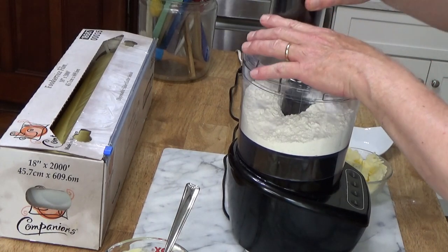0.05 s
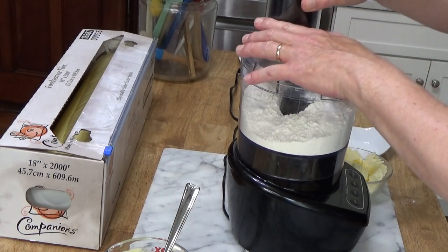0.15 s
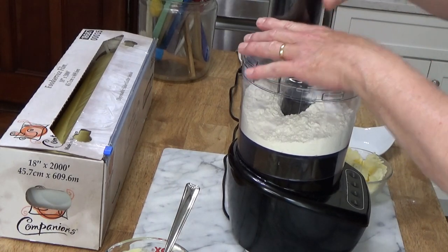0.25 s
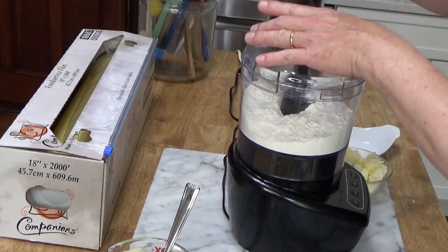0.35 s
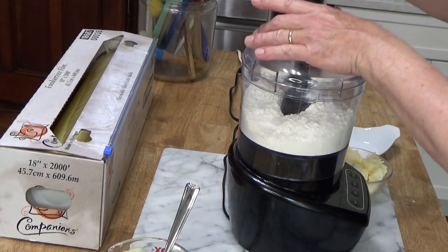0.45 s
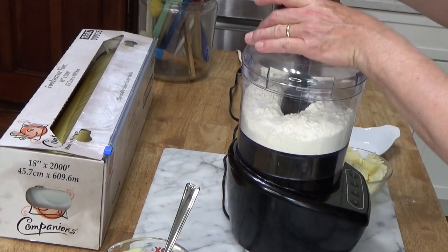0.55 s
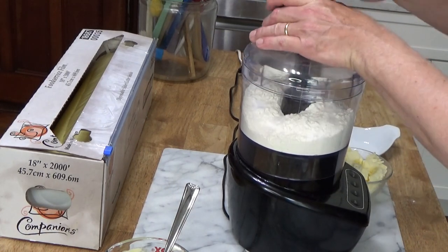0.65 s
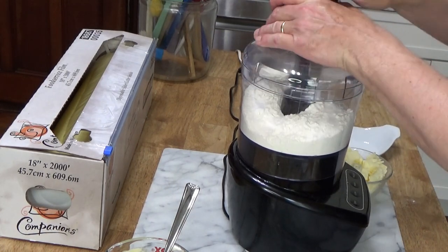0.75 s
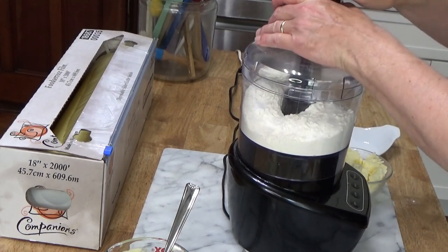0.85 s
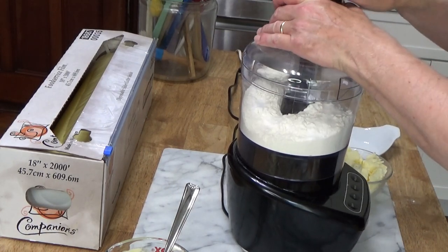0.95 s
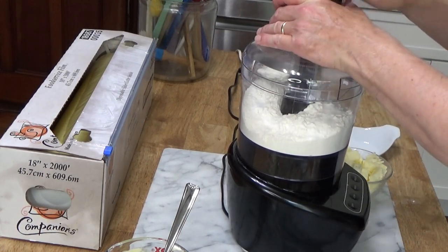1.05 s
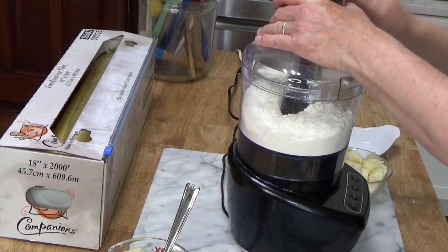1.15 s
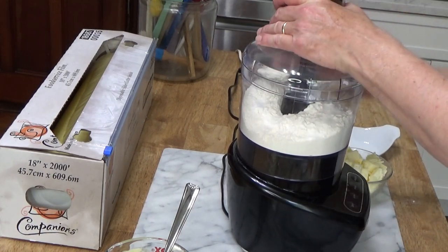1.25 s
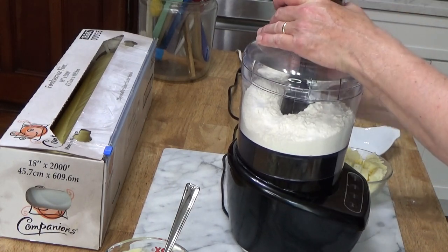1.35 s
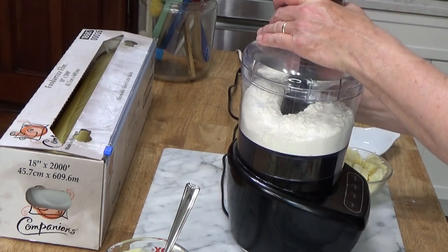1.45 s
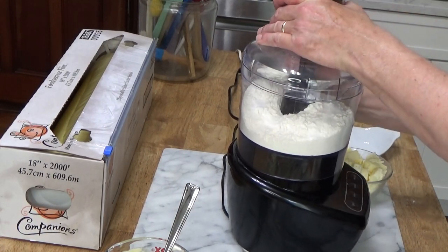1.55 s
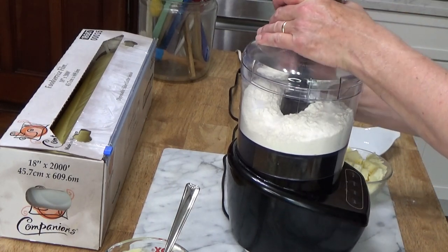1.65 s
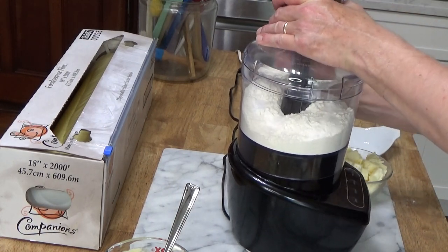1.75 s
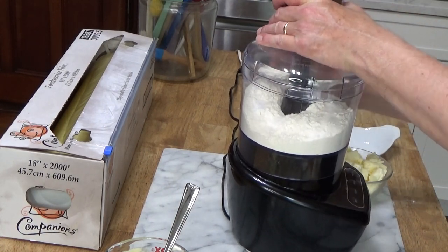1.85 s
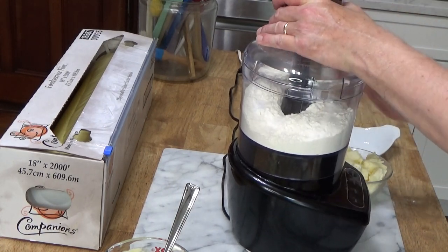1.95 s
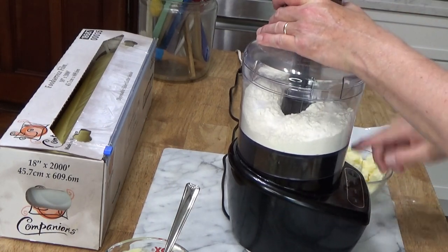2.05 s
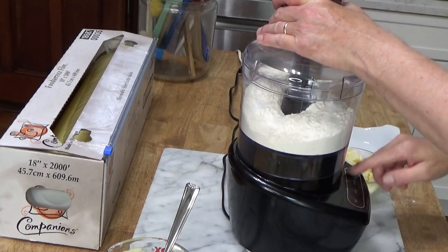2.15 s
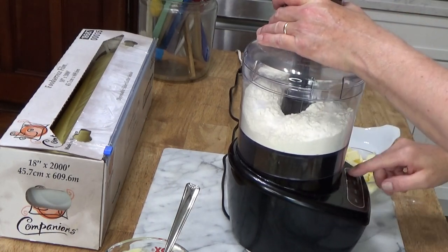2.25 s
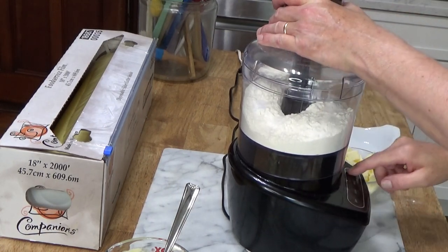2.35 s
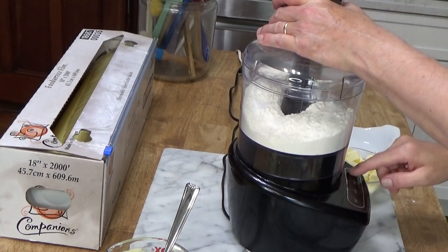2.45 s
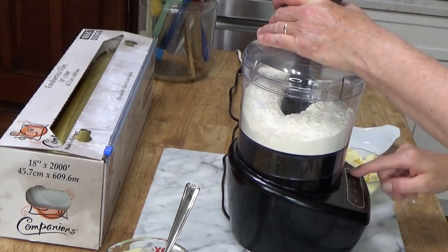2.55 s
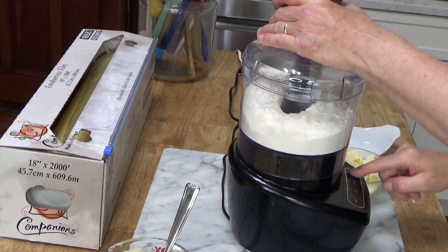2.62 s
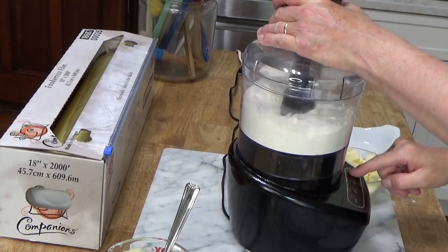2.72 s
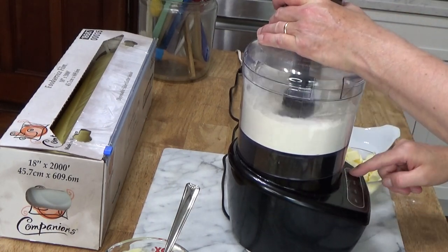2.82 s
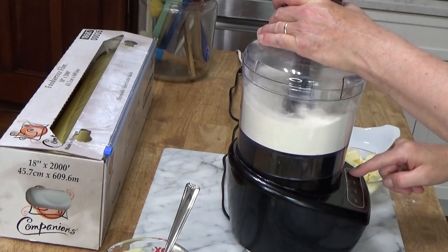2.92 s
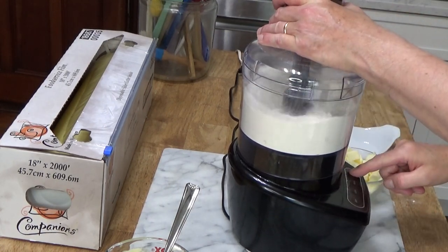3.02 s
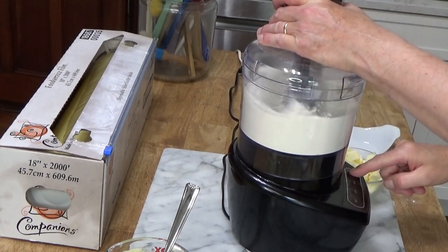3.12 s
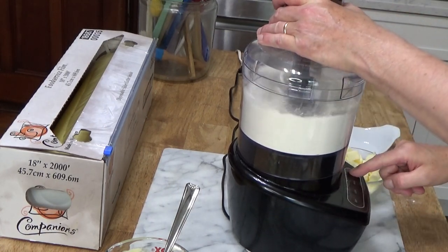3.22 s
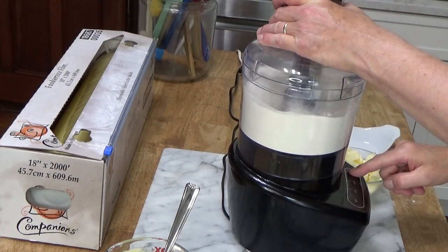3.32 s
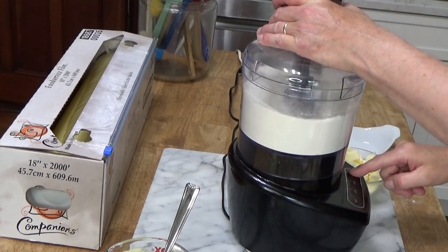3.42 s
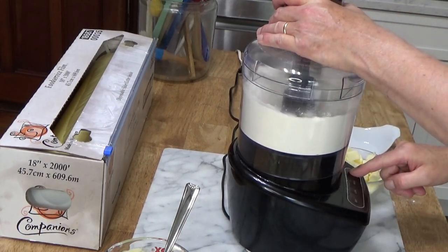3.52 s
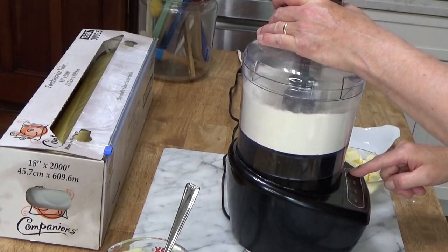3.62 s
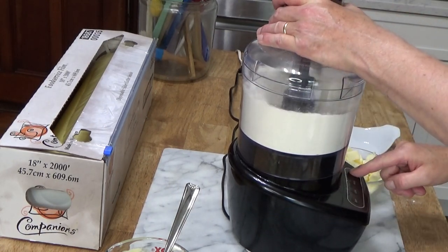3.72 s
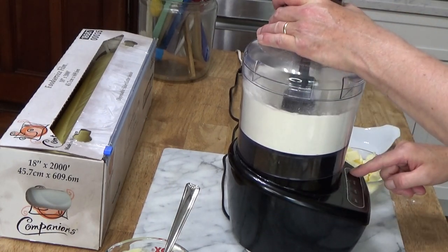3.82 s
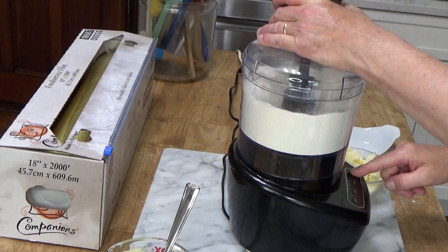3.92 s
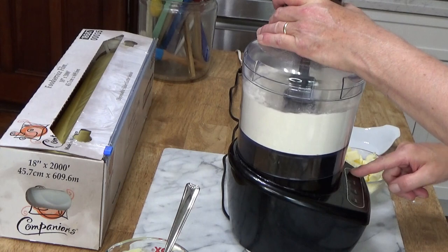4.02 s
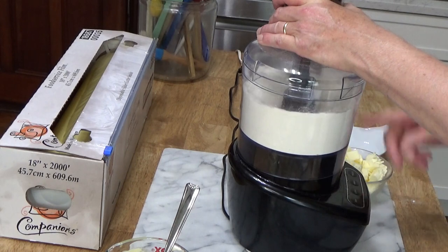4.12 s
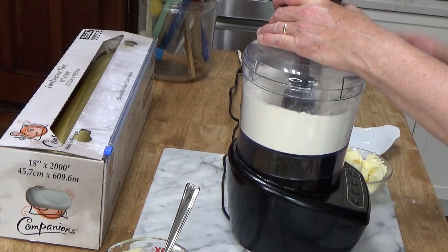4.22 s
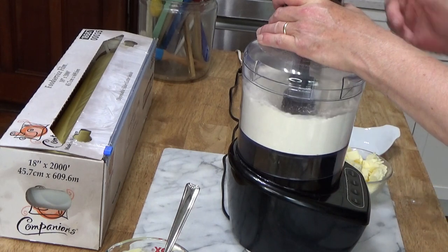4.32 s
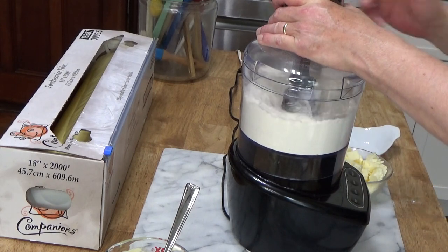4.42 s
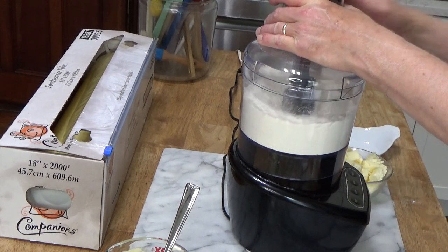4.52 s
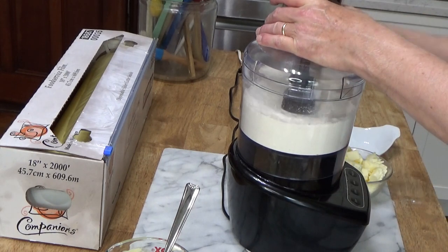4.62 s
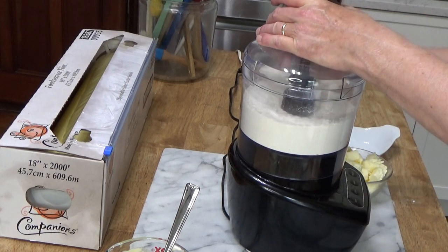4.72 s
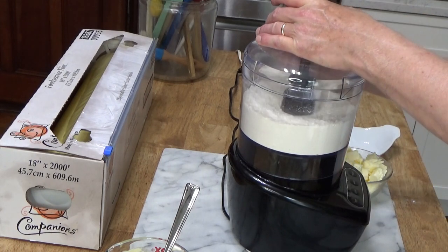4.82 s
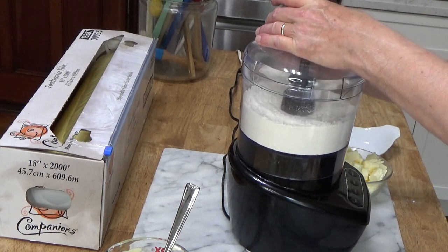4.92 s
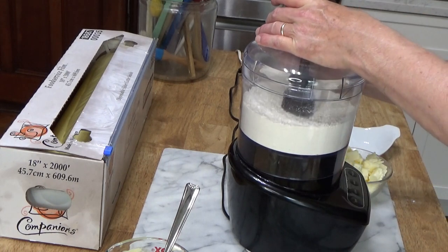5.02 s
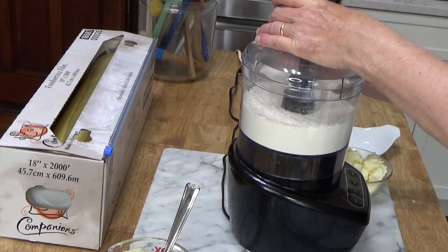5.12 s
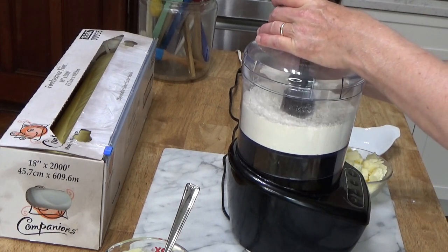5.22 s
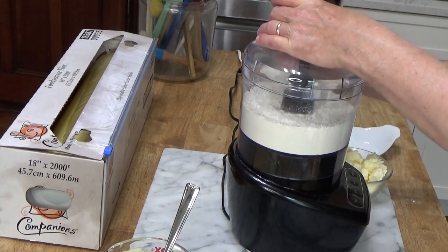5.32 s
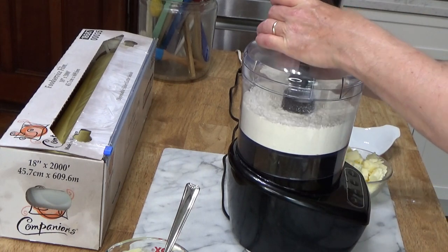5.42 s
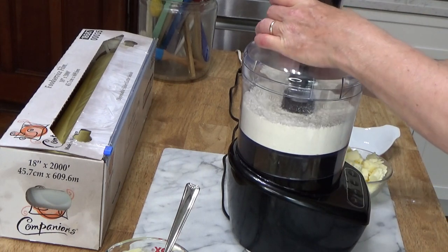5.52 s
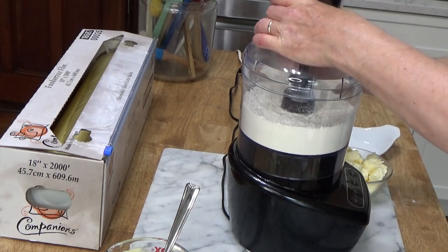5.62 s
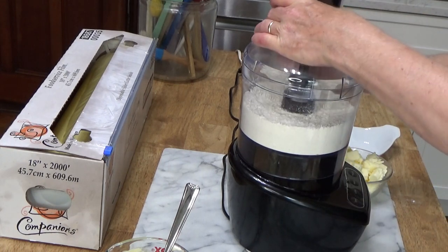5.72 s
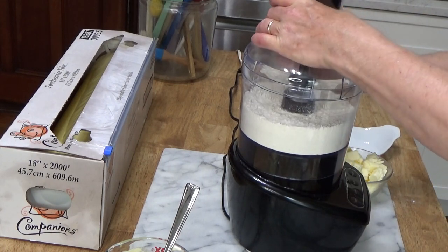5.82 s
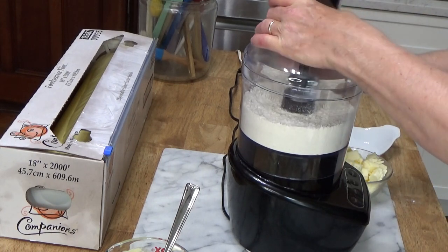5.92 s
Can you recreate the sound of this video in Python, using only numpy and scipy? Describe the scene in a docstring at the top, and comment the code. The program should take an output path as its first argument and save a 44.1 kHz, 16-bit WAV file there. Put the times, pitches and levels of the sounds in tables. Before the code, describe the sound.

Close in a hard, quiet kitchen, a plastic pusher clatters hollowly into a food processor tube, with small knocks and rubbing. Quick ticks lead to a sharp loud clack. After a pause, the motor surges on, runs as a loud airy roar for over a second, then glides down in pitch to a stop, followed by a light plastic click.

```python
"""A food processor runs for one pulse: air rushes, the rotor hums and the commutator whines, then it coasts to rest.
Filtered noise makes the air, fine random impacts make gears and sparks, and sine waves follow the turning shaft.
Before it, the plastic pusher knocks and slides into the feed tube and the bowl ratchets home; after it, the lid
is gripped again. Knocks are short noise bursts, rubbing is fine random impacts and the tube is wavering tones.
A hard kitchen adds echoes over a quiet floor, and a limiter holds down the loudest moments."""
import sys
import numpy as np
from scipy import signal
from scipy.fft import rfft, irfft, next_fast_len
from scipy.io import wavfile
from scipy.ndimage import uniform_filter1d

SR = 44100
rng = np.random.default_rng(int(sys.argv[2]) if len(sys.argv) > 2 else 0)


def file_out(sig):
    """Save sig as 16-bit WAV at sys.argv[1]."""
    # one column per channel
    cols = np.atleast_2d(sig).T
    # limit, then scale
    lim = np.clip(cols, -1, 1)
    pcm = np.round(lim * 32767).astype(np.int16)
    wavfile.write(sys.argv[1], SR, pcm)


N = 263076

# Levels in the tables are relative: the sounds are balanced again when mixed.
# Tone of the still kitchen: pitch_hz, level_db (per Hz)
QUIET_COLOUR = [(18, -57), (30, -31), (71, 0), (209, -4.5), (293, 9), (1010, 3.5), (7180, -3), (8190, -3),
                (10400, -4.5), (15800, -10)]
QUIET_DB = -62
# Time for echoes to fade by 60 dB: pitch_hz, fade_s
ECHO_FADE = [(150, 0.8), (400, 0.6), (1000, 0.65), (2800, 0.65), (7000, 0.54), (14000, 0.49)]
# Stereo width: pitch_hz, side_minus_mid_db
STEREO_WIDTH = [(60, -14), (120, -24.5), (240, -27), (480, -21), (950, -12), (1890, -11.5), (3770, -15),
                (7520, -9.5), (13000, -32)]
# Left-right balance: pitch_hz, left_minus_right_db
BALANCE = [(60, 0), (120, 2), (240, -3), (480, -2), (950, -1.5), (1890, -1.5), (3770, -1.5), (7520, -1.0),
           (15000, 1.5)]
CUTOFF_HZ = 15900

# Plastic parts striking each other: start_s, level_db, brightness_db_per_octave, decay_ms
KNOCKS = [(0.119, -14, 1.5, 4.7), (0.268, -25.5, 2.5, 2.5), (0.457, -31, 0, 4.2), (0.5922, -35.5, 4, 1.7),
          (0.7667, -31, 4.5, 3.8), (0.779, -31, -9.5, 4.6), (0.797, -30.5, 0.5, 2.4),
          (0.83, -32.5, 7.5, 3.4), (0.9014, -26.5, 4, 1.7), (0.980, -31, 6, 2.2), (1.011, -32, -1, 3),
          (1.029, -29, 5, 2), (1.046, -33, 2, 3), (1.296, -44.5, -4.5, 4.8), (1.393, -30.5, 2.5, 2.3),
          (1.6199, -3, 2.5, 5.5), (1.64, -18, 0.5, 3.2), (2.207, -46, 18, 2), (2.273, -47, 2, 2.6),
          (2.594, -52, -1, 9.1), (2.6155, -33, 3.5, 7.2), (5.694, -48, 3, 3), (5.8065, -27.5, 6, 4)]
# Dull blows on the bowl and base: start_s, level_db, decay_ms
THUDS = [(0.120, -23.5, 27), (1.622, -7, 4.6), (2.121, -46.5, 16), (2.157, -36, 16), (2.178, -40.5, 22),
         (5.830, -36.5, 3.2), (5.935, -44, 5.2), (5.953, -30, 4), (5.960, -32, 6)]
# Hollow pusher clattering into the mouth of the feed tube: start_s, level_db, decay_ms
CLATTER = [(0.001, -9, 3.4), (0.007, -8, 0.92), (0.017, -9, 2.9), (0.044, -5.5, 6.8), (0.071, -31, 4.8)]
# Short-lived ringing of the plastic bowl: pitch_hz, width_hz, boost_db
BOWL_RESONANCES = [(692.4, 58, 6.5), (1083, 123, 8.5), (1785, 730, 3), (2280, 250, 0.5), (2800, 300, 3),
                   (3380, 410, 4), (4960, 960, 4)]
# Tone of the knocks: pitch_hz, level_db (per Hz)
KNOCK_COLOUR = [(40, -47), (110, -15), (190, 2), (320, -10.5), (520, 3.5), (800, 7), (1250, 5), (2000, 2.5),
                (3000, -1), (4200, -3.5), (6000, -8), (10000, -16), (16000, -40)]
# Tone of the thuds: pitch_hz, level_db (per Hz)
THUD_COLOUR = [(40, -38), (110, -22), (220, -13), (450, -4.5), (800, 4), (1400, -15.5), (2500, -23),
               (8000, -49)]
# Tone of the clatter: pitch_hz, level_db (per Hz)
CLATTER_COLOUR = [(40, -41), (100, -37.5), (160, -16.5), (240, -15.5), (450, -15.5), (720, -6), (900, -16),
                  (1180, 4), (1400, -6.5), (2050, -2.5), (3300, -12), (4600, -11.5), (10000, -34),
                  (16000, -56)]
# Tone of rubbing plastic: pitch_hz, level_db (per Hz)
RUB_COLOUR = [(40, -40), (120, -11), (220, 9), (450, 3.5), (800, 10), (2000, 0.5), (5000, -3), (10000, -9),
              (16000, -25.5)]
# Tone of the dragging lid: pitch_hz, level_db (per Hz)
LID_COLOUR = [(500, -31), (1700, -1), (2150, 7), (2700, -2), (5000, 0.5), (7000, 2), (9500, -9),
              (12000, -20), (16000, -28)]
# The bowl ratchets round its seat in even ticks, each harder than the last
RATCHET_S, TICK_GAP_S = 1.4742, 0.0301
TICK_DB, TICK_GROWTH_DB = -37.5, 2.1
TICK_TILT_DB_PER_OCTAVE, TICK_DECAY_MS = 0.5, 3.6
# Strokes of plastic on plastic: start_s, length_s, level_db, swell_db (over the stroke)
RUBS = [(0, 0.076, -22.5, -15), (0.15, 0.81, -53.5, 5.5), (0.755, 0.33, -44.5, -2), (1.34, 0.19, -57, -2),
        (1.52, 0.09, -56, 22), (1.67, 0.33, -51, -0.5), (2.04, 0.038, -52, 6.5), (5.65, 0.24, -58, 0),
        (5.91, 0.068, -45, 15)]
# Lid dragging under the hand: start_s, length_s, level_db, swell_db (over the stroke)
LID_DRAGS = [(5.82, 0.065, -51, 15.5), (5.91, 0.06, -48, 1)]
RUB_ATTACK_S, RUB_RELEASE_S = 0.17, 0.083  # to rise and to fall by 60 dB

# Air ringing in feed tube and pusher: peak_s, pitch_hz, level_db, attack_s, release_s, unsteadiness_hz
# (attack and release each span 60 dB; pitch is at the peak)
TUBE_RINGS = [(0.07, 1149, -17, 0.32, 0.04, 64), (0.125, 649.5, -14, 0.02, 0.12, 34),
              (0.18, 640.6, -29, 0.088, 0.64, 20.3), (0.462, 682, -32.5, 0.018, 0.18, 19.8),
              (0.73, 661, -42.5, 0.5, 0.3, 24.5), (1.06, 694, -43.5, 0.5, 0.35, 19)]
# The air column shortens as the pusher sinks, so the pitch rises
TUBE_RISE_HZ_PER_S, TUBE_FLUTTER_DB = 170, 3

# The shaft speeds up while the button is held, coasts, then the flour stalls the blade
ON_S, OFF_S, STOP_S, STALL_S = 2.615, 3.937, 5.58, 0.225
TOP_TURNS_PER_S, SPIN_UP_S, SPIN_UP_SHAPE = 362.3, 0.160, 0.705
FRICTION_TURNS_PER_S2, DRAG_PER_S = 112.1, 0.589
# Running noise: level at top speed, power of speed its loudness follows, time to stir flour and air
RUN_DB, RUN_POWER, STIR_S = -15, 0.88, 0.024
# Fan air and churned flour at full speed: pitch_hz, level_db (per Hz)
RUSH_COLOUR = [(24, -98), (40, -48), (140, -25), (274, -11), (344, -8), (464, -13.5), (728, -0.5),
               (1790, -2), (2190, 1), (2950, -3), (3610, 1.5), (4090, -4.5), (5120, -0.5), (10600, -12.5),
               (15800, -34)]
# Gears and brushes when coasting: pitch_hz, level_db (per Hz)
GRIND_COLOUR = [(24, -73), (40, -56), (140, -36.5), (225, -15), (476, -15.5), (746, -0.5), (1110, -4),
                (1540, -3), (1750, -3), (2360, -2), (2610, -5.5), (3180, -6.5), (4090, -11), (9560, -17.5),
                (15800, -47)]
# Resonances of the housing: pitch_hz, width_hz, boost_db
HOUSING_RESONANCES = [(229, 66, 6), (330, 56, 2.5), (482, 50, 3), (750, 28, 7), (982, 40, 8), (1248, 45, 5),
                      (1541, 180, 6.5), (1900, 170, -1.5), (2222, 240, 6), (3150, 380, 4.5),
                      (4100, 370, -4), (4760, 290, 1.5), (6120, 330, 3), (8600, 78, 2), (9480, 490, 3),
                      (10500, 300, 2.5)]
# Resonances of the air ducts: pitch_hz, width_hz, boost_db
DUCT_RESONANCES = [(1530, 200, -0.5), (2406, 130, 6.5), (2810, 200, 5.5), (3633, 340, 8.5)]
# Resonances of the gear train and brush gear: pitch_hz, width_hz, boost_db
GEAR_RESONANCES = [(850, 93, 2), (1550, 350, 0), (6000, 300, 3), (7360, 800, -7), (8200, 170, 3),
                   (9760, 260, -3)]
# Faint rumble of the shaking base: pitch_hz, level_db (per Hz)
RUMBLE_COLOUR = [(20, 1), (50, 2), (90, -7), (200, -34), (800, -70)]
# How the base sounds the rotor's unbalance: pitch_hz, level_db
HUM_RESPONSE = [(80, -76), (125, -66.5), (165, -58), (200, -45.5), (230, -34), (360, -33)]
# How the base sounds the octave above: pitch_hz, level_db
OCTAVE_RESPONSE = [(140, -79), (220, -50), (480, -43.5), (640, -45), (690, -29.5), (718, -42)]
HUM_WAVER_DB = 0.5
# Starting current makes the brushes spark: peak level, and how sharply it peaks
SPARK_DB, SPARK_POWER = -24.5, 1.3
# Tone of the sparks: pitch_hz, level_db (per Hz)
SPARK_COLOUR = [(300, -22), (1500, -4), (3000, 9), (4200, -4), (6000, -5), (9500, -15), (12000, -20),
                (16000, -30)]
# Commutator overtones: multiple_of_shaft_speed, level_db
WHINE_OVERTONES = [(24, 1.5), (36, -4.5), (48, -2.5), (60, -3.5), (72, -2), (84, 4.5)]
# Band that the brush holders radiate: pitch_hz, level_db
BRUSH_HOLDER = [(2000, -28.5), (5000, -17), (6200, -12), (6900, 7), (7500, -2), (8050, 5.5), (8600, 0),
                (9000, -4), (9600, 2.5), (10400, -1), (15000, -39)]
# Overall whine at each shaft speed: turns_per_s, level_db
WHINE_BY_SPEED = [(40, -80), (85, -55), (120, -42.5), (180, -33), (300, -35.0), (355, -49)]


def from_db(db):
    """Turn decibels into a multiplier."""
    return 10 ** (np.asarray(db) / 20)


def rms_one(x):
    """Scale a sound to an average power of one."""
    return x / np.sqrt(np.mean(x ** 2) + 1e-20)


def at_hz(points, hz):
    """Read a curve between its points, with pitch spaced by ratio as the ear does."""
    f, value = np.transpose(points)
    return np.interp(np.log(np.maximum(hz, 1)), np.log(f), value)


def drift(rate_hz):
    """Smooth random wandering of typical size one, made at every 40th sample and joined up."""
    r = np.exp(-2 * np.pi * rate_hz * 40 / SR)
    noise = rng.standard_normal(N // 40 + 2002)
    slow = signal.lfilter([1], [1, -2 * r, r * r], noise)[2000:]  # skip the filter's settling
    return np.interp(np.arange(N) / 40, np.arange(len(slow)), rms_one(slow))


def coloured(x, spectrum, resonances=(), tilt_db=0):
    """Shape tone by a curve, resonance bumps and a tilt per octave, with no sound ahead of its cause."""
    size = 2 * next_fast_len(len(x) // 2 + 4096)
    hz = np.fft.rfftfreq(size, 1 / SR)
    db = at_hz(spectrum, hz) + tilt_db * np.log2(np.maximum(hz, 500) / 1000)
    for centre, width, boost in resonances:
        db = db + boost / (1 + (2 * (hz - centre) / width) ** 2)
    # Folding the cepstrum gives the filter that responds soonest (minimum phase)
    cepstrum = irfft(np.log(from_db(db)))[:size // 2]
    cepstrum[1:] *= 2
    response = np.exp(rfft(cepstrum, size))
    return irfft(rfft(x, size) * response)[:len(x)]


def noise_of(spectrum, resonances=()):
    """Steady random hiss with a chosen tone and unit power."""
    return rms_one(coloured(rng.standard_normal(N), spectrum, resonances))


def grains(per_s, spread_db):
    """Tiny random impacts of uneven size."""
    sizes = from_db(spread_db * np.minimum(rng.exponential(1, N), 4)) * rng.choice([-1, 1], N)
    return rms_one(sizes * (rng.random(N) < per_s / SR))


def envelope(start, length, level_db, swell_db, attack_s, release_s):
    """Loudness that rises, holds with a steady swell, then dies; attack and release each span 60 dB."""
    t = np.arange(N) / SR - start
    outside = np.maximum(-t, 0) / attack_s + np.maximum(t - length, 0) / release_s
    swell = swell_db * np.clip(t / max(length, 1 / SR), 0, 1)
    return from_db(level_db + swell - 60 * np.minimum(outside, 3))


def spread(mid, side):
    """A large source reaches the two microphones with partly unrelated sound."""
    return mid + coloured(side, STEREO_WIDTH) * np.array([[1], [-1]])


def add(out, s, sound):
    """Mix a sound in at a given time."""
    start = max(round(s * SR), 0)
    out[:, start:start + sound.shape[1]] += sound[:, :N - start]


def quiet_floor():
    """The still kitchen: steady, soft noise spread in stereo."""
    return from_db(QUIET_DB) * spread(noise_of(QUIET_COLOUR), noise_of(QUIET_COLOUR))


def kitchen(x, build_ms):
    """Echoes from hard walls build up, then die away at a different rate in each pitch band."""
    t = np.arange(SR) / SR
    edges = np.geomspace(40, 18000, num=15)
    tail = 0
    white = rng.standard_normal((2, 2, SR))
    for k, (low, high) in enumerate(zip(edges, edges[1:])):
        hz = np.sqrt(low * high)
        band = signal.butter(2, [low, high], "band", fs=SR, output="sos")
        mid, side = signal.sosfilt(band, white[k % 2])
        width = from_db(at_hz(STEREO_WIDTH, hz) + 4.5)  # echoes are wider than the source
        fade = from_db(-60 * t / at_hz(ECHO_FADE, hz))
        tail = tail + (mid + width * side * [[1], [-1]]) * fade
    build = 1 - np.exp(-(t * 1000 / build_ms) ** 2)
    tail = rms_one(tail * build) / np.sqrt(SR)
    return signal.fftconvolve(x[None], tail, axes=1)[:, :N]


def strokes(rows):
    """Loudness of a series of rubbing strokes."""
    return np.max([envelope(*row, RUB_ATTACK_S, RUB_RELEASE_S) for row in rows], axis=0)


def lid_drag():
    """The lid sticks and slips against the rim in fine, bright impacts."""
    slips = rms_one(coloured(grains(per_s=2700, spread_db=1.5), LID_COLOUR))
    return strokes(LID_DRAGS) * slips


def rubbing():
    """Plastic sticks and slips on plastic, with a wandering grip."""
    rub = rms_one(coloured(grains(per_s=1400, spread_db=2.0), RUB_COLOUR, BOWL_RESONANCES))
    grip_db = 2.4 * drift(30)
    return rub * strokes(RUBS) * from_db(grip_db - 2)


def ratchet(count):
    """Evenly spaced knocks that grow as the bowl tightens."""
    return [(RATCHET_S + k * TICK_GAP_S, TICK_DB + k * TICK_GROWTH_DB, TICK_TILT_DB_PER_OCTAVE, TICK_DECAY_MS)
            for k in range(count)]


def blow(colour, decay_ms, modes=(), tilt_db=0, size=4096):
    """Two rows: contact chattering for a few ms, heard directly, and an equal-energy pulse for the room."""
    ms = np.arange(size) * 1000 / SR
    flex = 1 - np.exp(-ms / 0.6)  # plastic gives a little before it bites
    chatter = rng.standard_normal(size) * flex * np.exp(-ms / decay_ms)
    pulse = signal.unit_impulse(size)
    rows = [rms_one(coloured(c, colour, modes, tilt_db)) for c in (chatter, pulse)]
    return np.array(rows) * np.sqrt(decay_ms / ms[-1])  # longer contact carries more energy


def handling():
    """Clatter, knocks, thuds and rubbing; two rows: direct sound, and sound sent into the room."""
    out = np.zeros((2, N))
    for s, level_db, decay_ms in CLATTER:
        add(out, s, from_db(level_db) * blow(CLATTER_COLOUR, decay_ms))
    for s, level_db, tilt_db, decay_ms in KNOCKS + ratchet(count=5):
        add(out, s, from_db(level_db) * blow(KNOCK_COLOUR, decay_ms, BOWL_RESONANCES, tilt_db))
    for s, level_db, decay_ms in THUDS:
        add(out, s, from_db(level_db) * blow(THUD_COLOUR, decay_ms, BOWL_RESONANCES))
    return out + lid_drag() + rubbing()


def feed_tube():
    """Air in the tube rings as narrow, unsteady tones that rise in pitch during each push."""
    t = np.arange(N) / SR
    out = 0
    waver = drift(94.6)
    flutter_db = TUBE_FLUTTER_DB * drift(60)
    for s, hz, level_db, attack_s, release_s, waver_hz in TUBE_RINGS:
        pitch_hz = hz + TUBE_RISE_HZ_PER_S * (t - s) + waver_hz * waver
        phase = 2 * np.pi * np.cumsum(pitch_hz) / SR
        out = out + envelope(s, 0, level_db, 0, attack_s, release_s) * np.sin(phase)
    return np.sqrt(2) * from_db(flutter_db) * out


def shaft_speed():
    """Turns per second: spin-up under power, coasting against friction and drag, and a final stall."""
    t = np.arange(N) / SR
    powered_s = np.clip(t - ON_S, 0, OFF_S - ON_S)
    driven = TOP_TURNS_PER_S * (1 - np.exp(-(powered_s / SPIN_UP_S) ** SPIN_UP_SHAPE))
    brake = FRICTION_TURNS_PER_S2 / DRAG_PER_S
    coasting = (driven + brake) * np.exp(-DRAG_PER_S * np.maximum(t - OFF_S, 0)) - brake
    return np.maximum(coasting, 0) * np.clip((STOP_S - t) / STALL_S, 0, 1)


def shudder(speed):
    """The churning load shakes the base: a faint rumble that grows with speed."""
    return from_db(-70) * noise_of(RUMBLE_COLOUR) * np.clip(speed / 350, 0, 1)


def rotor_hum(speed, turns):
    """Unbalance sounds at the shaft speed and its octave; each swells where the base resonates."""
    first_db = at_hz(HUM_RESPONSE, speed) + HUM_WAVER_DB * drift(4.1)
    second_db = at_hz(OCTAVE_RESPONSE, 2 * speed) + 2 * drift(8)
    first = from_db(first_db) * np.sin(2 * np.pi * turns)
    second = from_db(second_db) * np.sin(4 * np.pi * turns)
    return np.sqrt(2) * (first + second) * np.clip(speed / 85, 0, 1) ** 4


def sparks(speed):
    """Brush crackle needs both motion and starting current, which falls as speed rises."""
    pace = np.clip(speed / TOP_TURNS_PER_S, 0, 1)
    current = (1 - pace) * (np.arange(N) / SR < OFF_S)
    arcing = 27 / 4 * pace ** 2 * current  # peaks at 1, at two thirds of top speed
    crackle = rms_one(coloured(grains(per_s=13000, spread_db=0.0), SPARK_COLOUR, GEAR_RESONANCES))
    return from_db(SPARK_DB) * arcing ** SPARK_POWER * crackle


def commutator(speed, turns):
    """Brushes cross the segments; each overtone flares as it sweeps through the holders' resonances."""
    out = 0
    for order, level_db in WHINE_OVERTONES:
        hz = order * speed
        bounce = 1.1 * drift(130)  # bouncing brushes roughen the phase
        flicker_db = 1.8 * drift(40)
        muffled = np.interp(hz, [9700, 10500, 14000], [1, 0.2, 0])  # the housing swallows the top
        gain = from_db(level_db + at_hz(BRUSH_HOLDER, hz) + flicker_db) * muffled
        out = out + gain * np.sin(2 * np.pi * order * turns + bounce)
    return out * from_db(at_hz(WHINE_BY_SPEED, speed))


def gear_grind(turns):
    """Gears and brushes make gritty impacts that rub harder once a turn."""
    pressure = 1 + 0.12 * np.cos(2 * np.pi * turns)
    grit = pressure * grains(per_s=9300, spread_db=2.5)
    return rms_one(coloured(grit, GRIND_COLOUR, HOUSING_RESONANCES + GEAR_RESONANCES))


def machine_noise(speed, turns):
    """Louder with speed; fan rush takes over from gritty gear noise as the shaft gets faster."""
    pace = speed / TOP_TURNS_PER_S
    air = np.clip(speed / 350, 0, 1) ** 2.6
    ducted = HOUSING_RESONANCES + DUCT_RESONANCES
    rush = spread(noise_of(RUSH_COLOUR, ducted), noise_of(RUSH_COLOUR, ducted))
    grind = spread(gear_grind(turns), gear_grind(turns))
    churn_db = 0.45 * drift(18)
    stirred = 1 - np.exp(-np.maximum(np.arange(N) / SR - ON_S, 0) / STIR_S)
    gain = stirred * pace ** RUN_POWER * from_db(RUN_DB + churn_db)
    return gain * (np.sqrt(air) * rush + np.sqrt(1 - air) * grind)


def scene():
    """Handling and motor in the kitchen, over its quiet floor."""
    speed = shaft_speed()
    uneven = 1 + 0.00139 * drift(9.35)  # the flour loads the blade unevenly
    turns = np.cumsum(speed * uneven) / SR
    direct, sent = handling()
    tube = feed_tube()
    motor = machine_noise(speed, turns) + commutator(speed, turns) + sparks(speed)
    base = rotor_hum(speed, turns) + shudder(speed)  # close and heavy: heard almost dry
    to_room = from_db(-3.0) * sent + from_db(-8.5) * tube
    to_room = to_room + from_db(-9) * motor.mean(axis=0) + from_db(-11) * base
    echo = kitchen(to_room, build_ms=7.8)
    return from_db(-1.25) * direct + tube + motor + base + echo + quiet_floor()


def limiter(x, ceiling_db, release_db_per_s):
    """Turn the sound down when its short-time level passes the ceiling, then recover steadily."""
    power = uniform_filter1d(np.mean(x ** 2, axis=0), size=110)  # 2.5 ms average
    over = np.maximum(10 * np.log10(np.maximum(power, 1e-12)) - ceiling_db, 0)
    ramp = release_db_per_s * np.arange(N) / SR
    held = np.maximum.accumulate(over + ramp) - ramp
    return x * from_db(-uniform_filter1d(held, size=44))  # 1 ms smoothing


def record(dry):
    """Microphone balance, limiter and a steep top cut."""
    size = 2 * next_fast_len(N // 2 + 4096)
    lean_db = at_hz(BALANCE, np.fft.rfftfreq(size, 1 / SR)) / 2
    sides = np.array([[1], [-1]])
    heard = irfft(rfft(dry, size) * from_db(lean_db * sides))[:, :N]
    held = limiter(heard, ceiling_db=-14.5, release_db_per_s=304)
    top_cut = signal.ellip(10, 0.1, 80, CUTOFF_HZ, fs=SR, output="sos")
    return signal.sosfilt(top_cut, held)


dry = scene()
out = record(dry)
file_out(out)
```